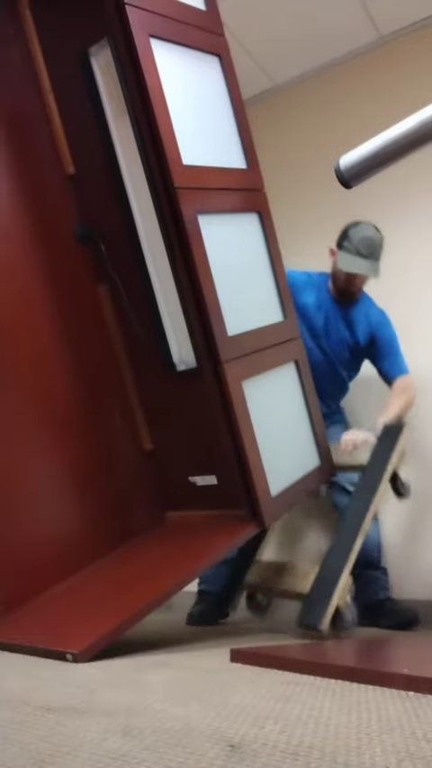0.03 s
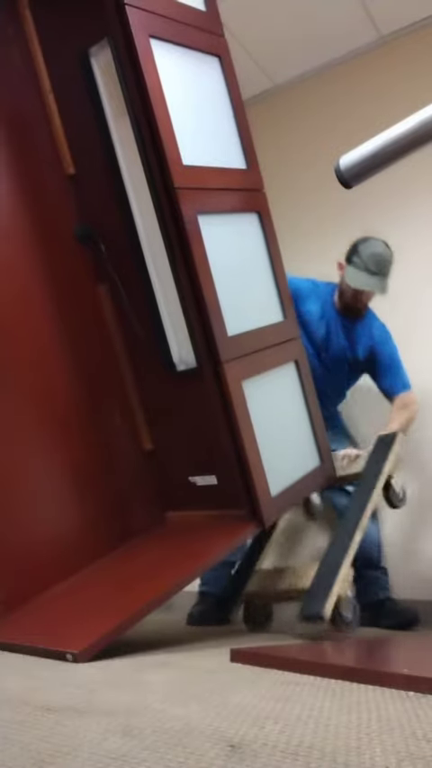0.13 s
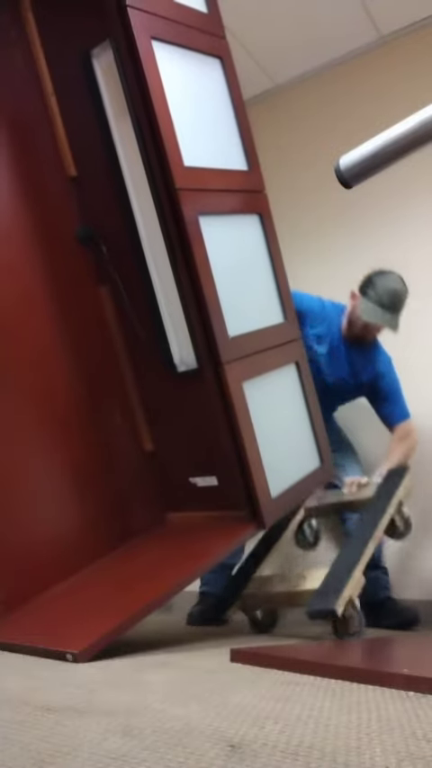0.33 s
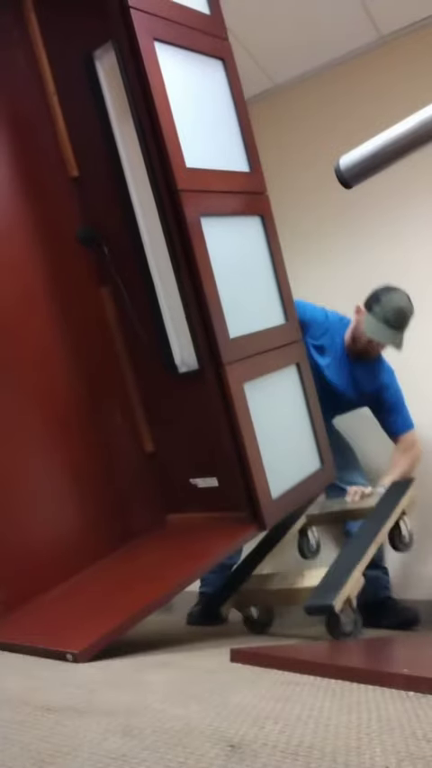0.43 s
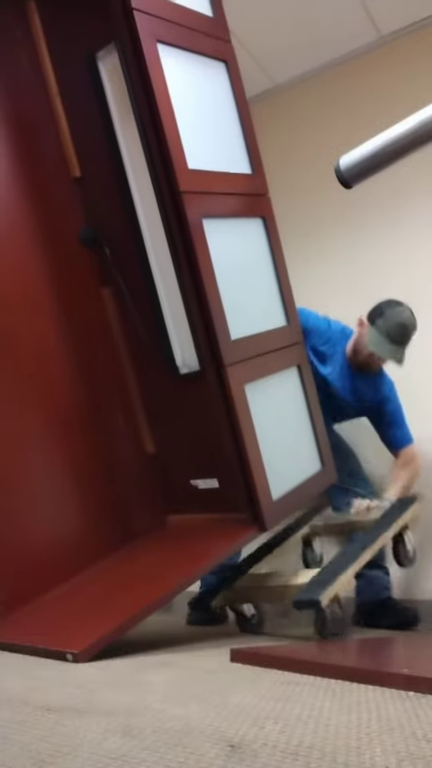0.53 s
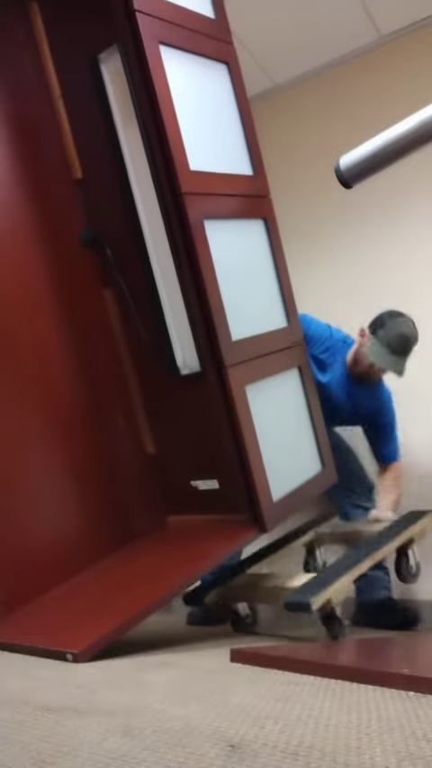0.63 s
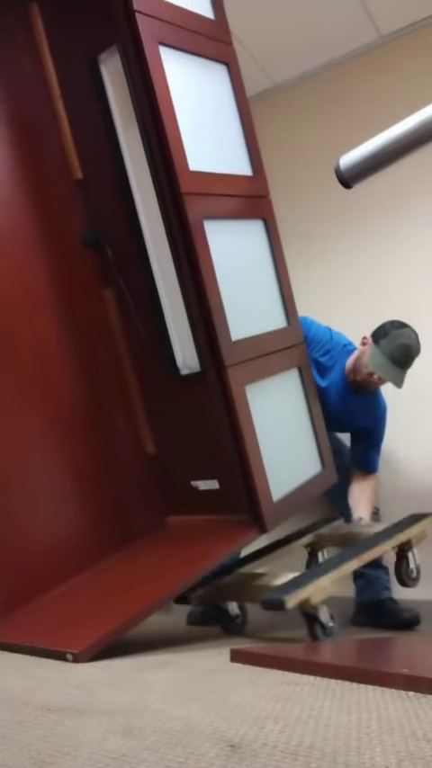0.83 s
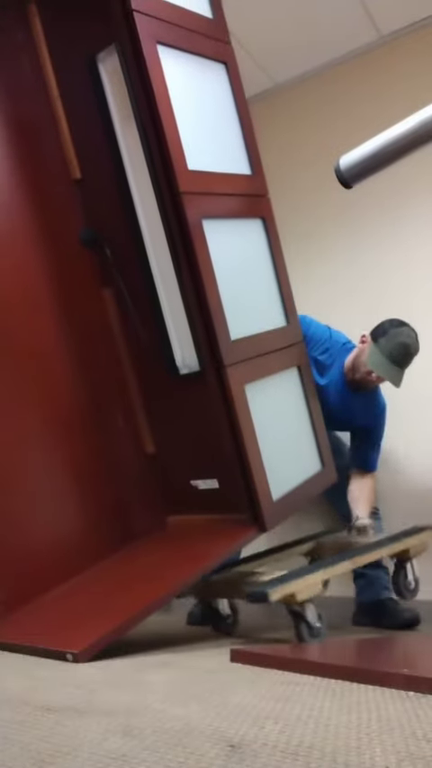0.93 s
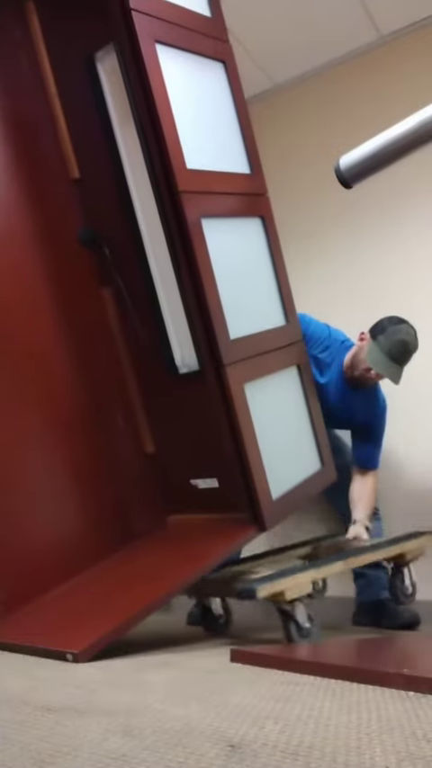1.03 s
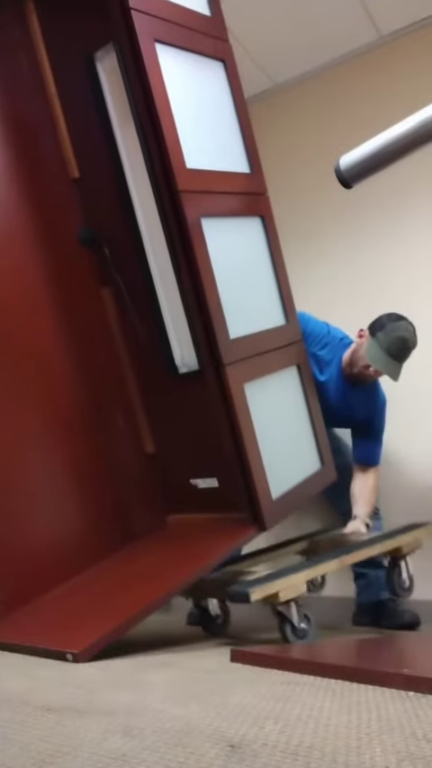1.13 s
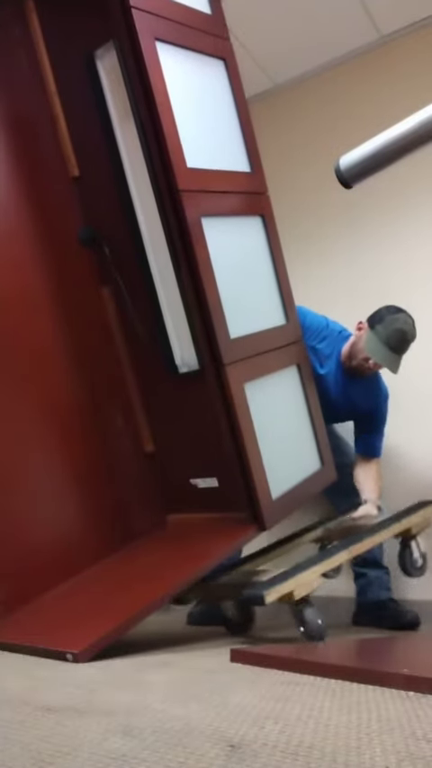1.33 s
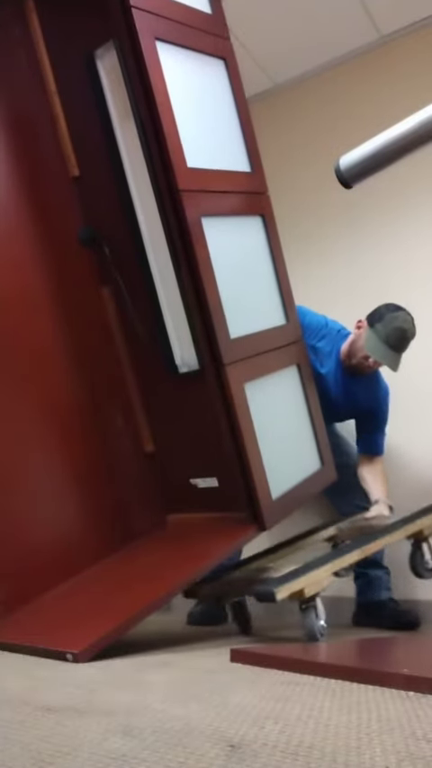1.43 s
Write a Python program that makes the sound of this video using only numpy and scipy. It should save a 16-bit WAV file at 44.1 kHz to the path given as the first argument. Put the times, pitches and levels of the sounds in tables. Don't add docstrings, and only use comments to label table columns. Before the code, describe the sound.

Wooden dolly knocking a tipped cabinet, close up in a small carpeted office with faint air handling. A hard, hollow clustered bang with rattling panes comes at 0.2-0.3 s, a second, weaker knock at 0.41-0.45 s, then loose casters chatter until about 0.65. A rail scrapes carpet from 0.7 to 0.9 with a light thud and tiny tick; faint brushes follow, then dull soft shuffles around 1.4. Band-limited phone microphone.

```python
import sys
import numpy as np
from scipy import signal
from scipy.fft import rfft, irfft
from scipy.io import wavfile
from scipy.ndimage import uniform_filter1d

SR = 44100
rng = np.random.default_rng(int(sys.argv[2]) if len(sys.argv) > 2 else 0)


def unload_audio(sound):
    columns = np.transpose(np.atleast_2d(sound))
    steps = np.round(np.clip(columns, -1, 1) * 32767)
    wavfile.write(sys.argv[1], SR, steps.astype(np.int16))


def attenuation_scalar(level_db):
    decades = np.asarray(level_db, float) / 20
    return 10 ** decades


N = 66150

# frequency [Hz], level [dB].
AIR_COLOUR = [(25, -7.5), (60, 3.5), (130, -2.5), (300, -15), (1290, -20), (1500, -26), (8000, -34.5),
              (10400, -72.5)]
# start [s], rise [s], hold [s], level [dB], treble gain [dB].
SHUFFLES = [
    (0.045, .03, 0.041, -70.5, -5),
    (0.866, .02, .24, -74, 8),
    (0.964, 0.007, .02, -58.5, 0),
    (0.982, 0.014, 0.023, -64, 6.5),
    (1.33, 0.0048, .04, -66, 2.5),
    (1.369, 0.036, 0.025, -53, -13.5),
    (1.428, 0.0047, 0.051, -52, -4.5),
]
# frequency [Hz], level [dB].
SHUFFLE_COLOUR = [(40, -31.5), (70, -12), (130, -10), (600, -3), (1010, -6), (1720, -16), (2820, -17),
                  (5530, -28), (8000, -35)]
# start [s], level [dB], contact time [ms].
CABINET_BLOWS = [(.186, -23.5, 0.32), (.191, -30, 0.13), (.199, -26, 0.15), (.231, -10, .6),
                 (.2325, -3.5, .6), (.2400, -5.5, 0.42), (.248, -12, 0.094), (.259, -16, 0.3),
                 (.281, -20, 0.37), (.296, -19, 0.57), (.421, -17, 0.67), (.430, -25.5, 0.39)]
# start [s], level [dB], contact time [ms].
DOLLY_BLOWS = [(.191, -10.5, 0.69), (.207, -15, 0.28), (.411, -11.5, 0.53), (.4145, -8, 0.31),
               (.425, -11, 0.39), (.452, -21.5, .5), (.465, -22, .6), (.59, -20.5, .9), (.768, -21.5, 1.97),
               (.965, -39, 0.65), (.974, -45.5, 0.8)]
# frequency [Hz], level [dB], 60 dB decay time [s].
CABINET_MODES = [(162.7, -16.5, 0.049), (205.3, -19.5, 0.16), (420, -6.5, .06), (660, -9, 0.067),
                 (714, 3, 0.036), (876, 4.5, 0.068), (1073.5, 4.5, .05), (1377, 2.5, .05), (1509, -3, 0.1),
                 (1845, -0.5, 0.078), (2211, 2, .04), (2916, -6, .04), (3920, -11.5, .04),
                 (4780, -30.5, .04)]
# frequency [Hz], level [dB], 60 dB decay time [s].
DOLLY_MODES = [(166, -4.5, 0.033), (272, -12.5, 0.051), (426.2, -3, 0.035), (510.4, -4, 0.019),
               (592.4, -10, 0.11), (726.4, 6.5, 0.029), (880, -8.5, 0.026), (1102.6, 3.5, 0.057),
               (1382, -1, 0.12), (1644, -7.5, 0.09), (2180, -12, 0.12), (2650, -11, 0.057),
               (3800, -27, .04)]
# start [s], length [s], level [dB].
CLATTER = [
    (0.187, 0.031, -43.5),
    (0.233, .048, -34.5),
    (0.283, 0.04, -51.5),
    (0.471, 0.042, -51),
    (0.762, 0.058, -49),
    (1.455, 0.016, -72.5),
]
# frequency [Hz], level [dB per Hz].
CLATTER_COLOUR = [(1500, -30), (2500, 5.5), (3900, 5), (5000, -6.5), (7500, -18.5), (9000, -37.5)]
# frequency [Hz], level [dB], 60 dB decay time [s].
CASTER_MODES = [(213, -8.5, 0.02), (425, -8, 0.072), (598, -8, 0.034), (865.6, -11.5, 0.058),
                (1117, -13, 0.077), (1518, -15, 0.013), (2206, -3.5, 0.023), (2900, -16, 0.02),
                (3880, -22.5, .025), (5750, -41.5, 0.0054)]
# time [s], level [dB].
SHAKE = [(.41, -63.5), (.44, -35.5), (.48, -42), (.515, -39.5), (.54, -43), (.57, -46), (.62, -46.5),
         (.68, -63), (.74, -41.5)]
# time [s], level [dB].
DRAG_PRESSURE = [(.705, -64), (.716, -36), (.76, -38.5), (.78, -34), (.83, -42.5), (.86, -45),
                 (.905, -58.5), (.955, -57.5)]
# frequency [Hz], level [dB per Hz].
DRAG_COLOUR = [(60, 8), (133, 3.5), (428, 0.5), (971, -6.5), (2400, -4), (3500, -13.5), (6130, -16.5),
               (8000, -38.5)]
# frequency [Hz], 60 dB decay time [s].
ROOM_DECAY = [(100, .45), (400, 0.49), (1000, 0.32), (2500, .3), (5000, 0.23), (8000, 0.19)]

AIR_DB = -63.5
WHINE_HZ, WHINE_DB = 1260, -79.5
SHUFFLE_FALL_S = .03
CRACK_DB, CRACK_S = -16, 0.0076
RING_CYCLES, RING_S = 18, .03
CHATTER_PER_S, CHATTER_SPREAD_DB = 400, 4
DULLING_DB = 5.5
SNAP_S, SNAP_DB, SNAP_HZ = .771, -22, 5400
ROOM_DB, NEAR_SEND_DB = 0.5, -9.5
CEILING, EDGE_HZ, HISS_DB = 1.02, 7770, -97.5


def evened(x):
    return x / np.sqrt(np.mean(x ** 2) + 1e-20)


def read(points, hz):
    f, value = np.transpose(points)
    return np.interp(np.log(hz + 1), np.log(f + 1), value)


def curve(points):
    return np.interp(np.arange(N) / SR, *np.transpose(points), left=-200, right=-200)


def coloured(x, points):
    gain = attenuation_scalar(read(points, np.fft.rfftfreq(N, 1 / SR)))
    return evened(irfft(rfft(x) * gain, N))


def split(x, hz):
    low = signal.sosfiltfilt(signal.butter(2, hz, fs=SR, output="sos"), x)
    return low, x - low


def grains(per_s, spread_db):
    hit, size, sign = rng.random((3, N))
    level = attenuation_scalar(spread_db * np.minimum(-np.log(size + 1e-9), 4))
    return (hit < per_s / SR) * level * np.sign(sign - .5)


def ring(modes, spread_db, detune, rise_s):
    t = np.arange(SR // 6) / SR
    hz, db, t60 = np.repeat(np.transpose(modes), 6, axis=1)[:, :, None]
    spot, shift, turn = rng.standard_normal((3, 6 * len(modes), 1))
    t60 = np.minimum(t60, RING_S + RING_CYCLES / hz)
    level = attenuation_scalar(db + spread_db * shift - 60 * t / t60)
    bunch = level * np.sin(2 * np.pi * hz * (1 + detune * spot) * t + 2 * turn)
    return bunch.sum(0) / 5 * np.minimum(t / rise_s, 1)


def air():
    hz, t, z = signal.stft(coloured(rng.standard_normal(N), AIR_COLOUR), SR, nperseg=1024, noverlap=768)
    patches = uniform_filter1d(rng.standard_normal(z.shape), size=8, axis=0)
    patches = evened(uniform_filter1d(patches, size=8, axis=1))
    wash = signal.istft(z * attenuation_scalar(1.8 * patches), SR, nperseg=1024, noverlap=768)[1][:N]
    waver = evened(uniform_filter1d(rng.standard_normal(N), size=2000))
    whine = np.sin(2 * np.pi * np.cumsum(WHINE_HZ + 8 * waver) / SR)
    return attenuation_scalar(AIR_DB) * evened(wash) + attenuation_scalar(WHINE_DB) * whine


def shuffles():
    t = np.arange(N) / SR
    s, rise, hold, db, treble_db = np.transpose(SHUFFLES)[:, :, None]
    swell = np.clip((t - s) / rise, 0, 1) ** 2
    fall = np.exp(-np.maximum(t - s - rise - hold, 0) * 3 / SHUFFLE_FALL_S)
    level = attenuation_scalar(db) * swell * fall
    lumps = attenuation_scalar(3.4 * evened(uniform_filter1d(rng.standard_normal(N), size=500)))
    fibres = grains(6000, 2.5) + rng.standard_normal(N)
    low, high = split(coloured(fibres, SHUFFLE_COLOUR), 1540)
    return lumps * (level.sum(0) * low + (level * attenuation_scalar(treble_db)).sum(0) * high)


def knocks(blows, modes):
    out = np.zeros(N + SR)
    t = np.arange(SR // 6) / SR
    for s, db, ms in blows:
        body = ring(modes, spread_db=0.0, detune=.05, rise_s=0.0014)
        crack = rng.standard_normal(len(t)) * np.exp(-t / CRACK_S) * np.minimum(t / 0.0045, 1)
        sound = body + attenuation_scalar(CRACK_DB) * crack
        r = np.exp(-4e3 / (max(ms, .05) * SR))
        push = signal.lfilter([(1 - r) ** 2], [1, -2 * r, r * r], sound)
        at = round(s * SR)
        out[at:at + len(t)] += attenuation_scalar(db) * push
    return out[:N]


def clatter():
    t = np.arange(N) / SR
    s, length, db = np.transpose(CLATTER)[:, :, None]
    rise = np.clip((t - s) / 0.0028, 0, 1)
    level = attenuation_scalar(db) * rise * np.exp(-np.maximum(t - s - length, 0) / 0.002)
    return level.sum(0) * coloured(grains(4500, 3.51), CLATTER_COLOUR)


def casters():
    shake = curve(SHAKE)
    out = np.zeros(N)
    for wheel in range(4):
        taps = grains(CHATTER_PER_S / 4, CHATTER_SPREAD_DB) * attenuation_scalar(shake)
        body = ring(CASTER_MODES, spread_db=1.5, detune=0.051, rise_s=0.00033)
        out += signal.fftconvolve(taps, body)[:N]
    low, high = split(out, 2000)
    return 3 * (low + high * attenuation_scalar(3.3 * np.clip(shake + 38, -20, 5)))


def drag():
    rub = coloured(grains(5000, 2.6) + 0.52 * rng.standard_normal(N), DRAG_COLOUR)
    press = curve(DRAG_PRESSURE)
    low = signal.sosfilt(signal.butter(2, 2500, fs=SR, output="sos"), rub)
    return attenuation_scalar(press) * (low + (rub - low) * attenuation_scalar(DULLING_DB * (press + 38) / 20))


def caster_snap():
    t = np.arange(300) / SR
    band = signal.butter(2, [.7 * SNAP_HZ, 1.45 * SNAP_HZ], "band", fs=SR, output="sos")
    snap = signal.sosfilt(band, rng.standard_normal(300) * np.exp(-t / .0014))
    out = np.zeros(N)
    out[round(SNAP_S * SR):][:300] = attenuation_scalar(SNAP_DB) * snap / abs(snap).max()
    return out


def office(x):
    taps = np.zeros(SR)
    at = np.arange(200, SR - 20, 20)
    taps[at + rng.integers(0, 20, len(at))] = rng.choice([-1., 1.], len(at))
    hz, t, z = signal.stft(taps, SR, nperseg=256)
    decay = attenuation_scalar(-60 * t / read(ROOM_DECAY, hz)[:, None])
    tail = signal.istft(z * decay, SR, nperseg=256)[1]
    return signal.fftconvolve(x, tail / np.linalg.norm(tail))[:N]


def scene():
    wood = knocks(CABINET_BLOWS, CABINET_MODES) + knocks(DOLLY_BLOWS, DOLLY_MODES) + casters()
    near = drag() + caster_snap() + shuffles() + clatter()
    reflections = attenuation_scalar(ROOM_DB) * office(wood + attenuation_scalar(NEAR_SEND_DB) * near)
    return (wood + near + reflections + air())[None]


def low_pass(x):
    return signal.sosfilt(signal.butter(12, 8370, fs=SR, output="sos"), x)


def record(dry):
    x = signal.sosfilt(signal.butter(3, 110, "high", fs=SR, output="sos"), dry)
    x = x / (1 + (abs(x) / CEILING) ** 4) ** .25
    band_limit = signal.firwin(255, EDGE_HZ, window=("kaiser", 10), fs=SR)
    x = signal.oaconvolve(x, band_limit[None], "same")
    return low_pass(x + attenuation_scalar(HISS_DB) * rng.standard_normal(x.shape))


dry = scene()
out = record(dry)
unload_audio(out)
```